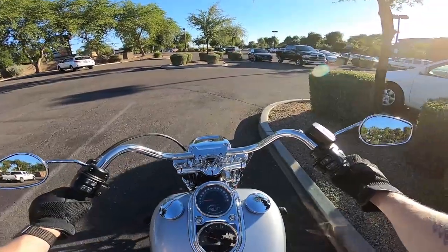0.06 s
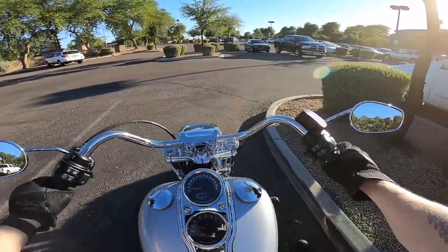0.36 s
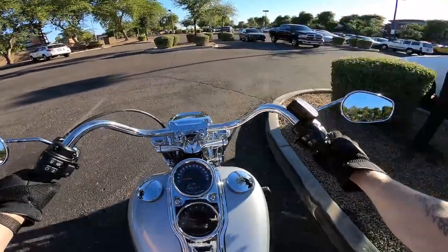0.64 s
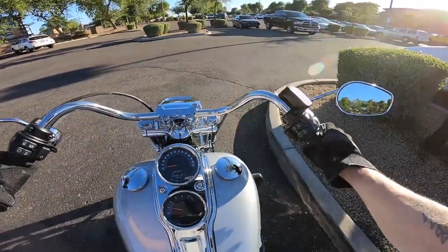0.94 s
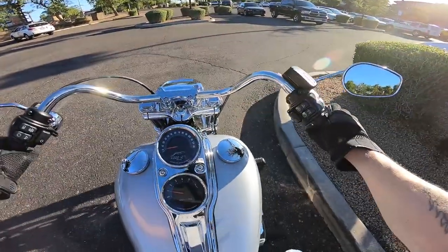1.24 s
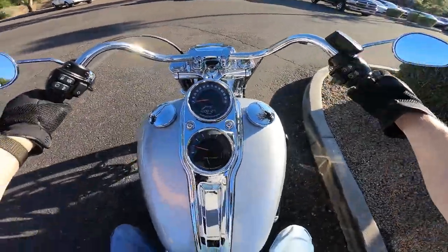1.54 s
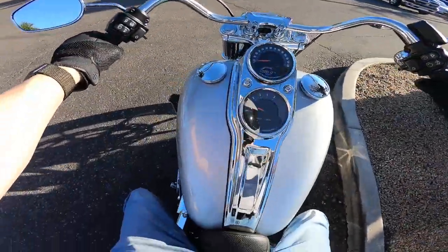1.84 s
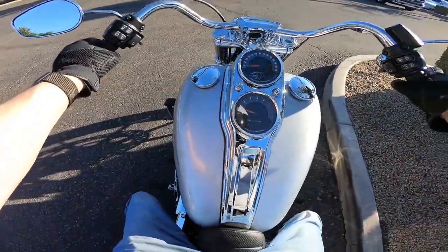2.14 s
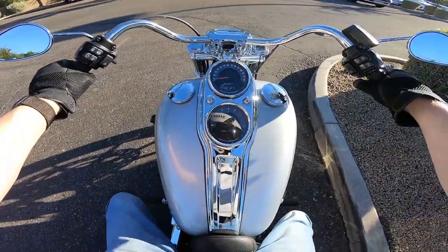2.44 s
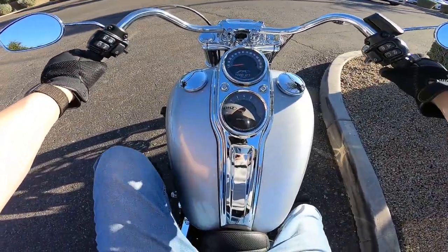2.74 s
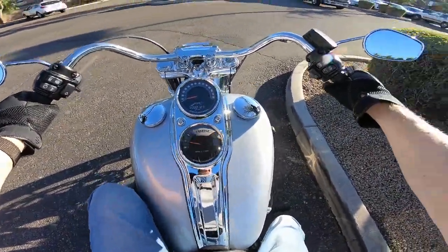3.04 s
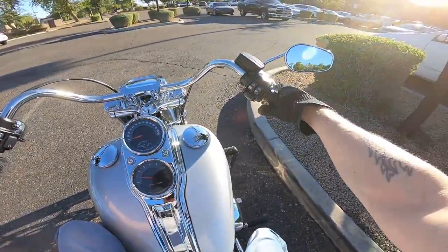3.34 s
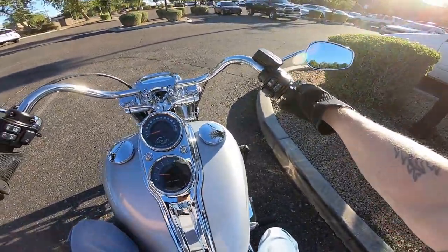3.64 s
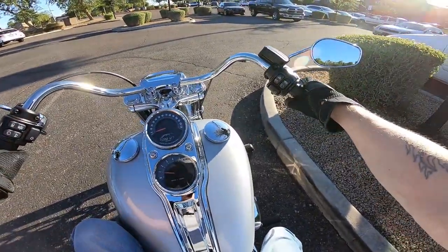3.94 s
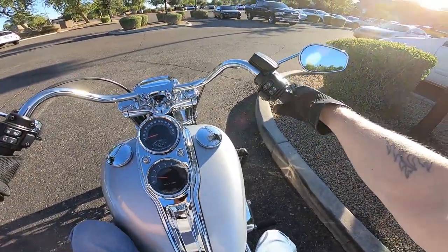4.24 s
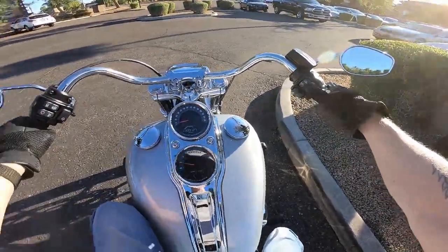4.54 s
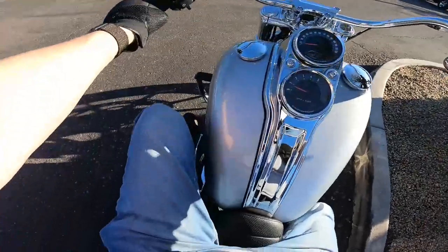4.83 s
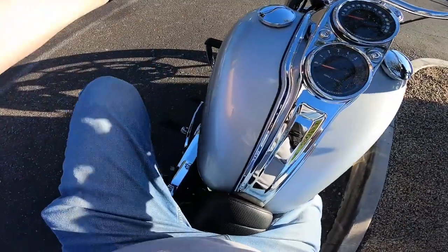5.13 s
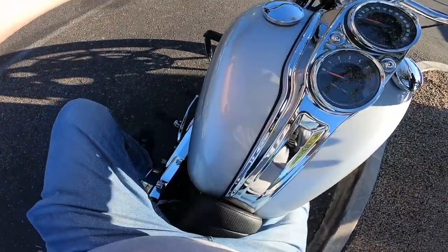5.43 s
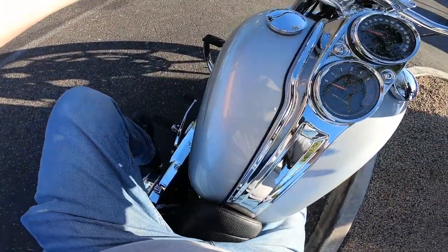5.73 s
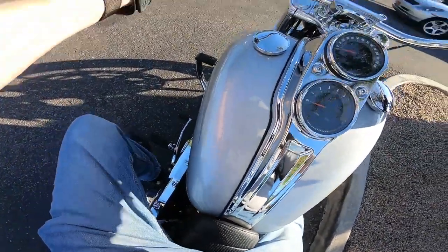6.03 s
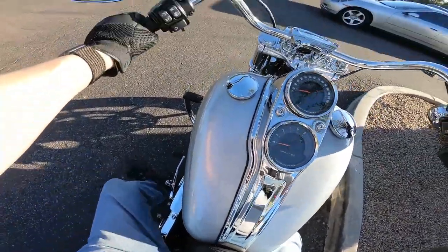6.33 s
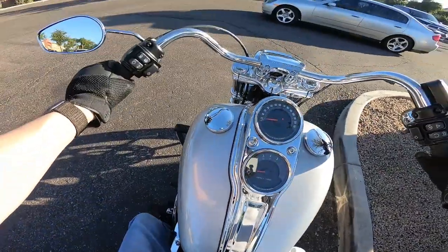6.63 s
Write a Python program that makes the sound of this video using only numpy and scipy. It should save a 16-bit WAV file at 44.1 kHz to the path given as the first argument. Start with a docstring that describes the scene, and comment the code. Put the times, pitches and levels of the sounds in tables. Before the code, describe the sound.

A big V-twin motorcycle is idling in a parking lot from the start, heard close and muffled from the rider's helmet. Its deep, loping throb begins slightly faster, settles within the first second, then keeps wavering a little in speed. Gear whine, light valve clatter and a very faint high fuel pump whine sit beneath it, with two dull knocks at around 0.3 seconds. A handlebar switch clicks at about 4.8 seconds and another at 5 seconds, and the firing ends right after. The engine coasts down and is still by about 5.8 seconds, shuddering with several dull jolts and small metal ticks. As the throb goes, a much quieter low rumble of distant traffic comes up, with a car humming softly past around 5.9 seconds. One last light tick comes at about 6.4 seconds.

```python
"""A car park, heard muffled from a rider's helmet: a big V-twin motorcycle idles unevenly.
Exhaust pulses and intake gulps excite the resonances of pipes and airbox, and throb over gear whine
and valve clatter. A switch clicks, the firing ends, and friction brings the crank to rest with a
shudder. A limiter, held down by the throb, then lets go, and distant traffic comes up."""
import sys
import numpy as np
from scipy import signal
from scipy.fft import rfft, irfft, next_fast_len
from scipy.io import wavfile
from scipy.ndimage import uniform_filter1d, minimum_filter1d

SR = 44100
rng = np.random.default_rng(int(sys.argv[2]) if len(sys.argv) > 2 else 0)


def to_wav(sig):
    """Store sig (one row per channel, or 1-D mono) as 16-bit WAV at the path in sys.argv[1].

    Samples outside -1..1 are clipped; the rate is SR.
    """
    pcm = np.clip(np.atleast_2d(sig), -1, 1) * 32767
    pcm = np.round(pcm).astype(np.int16)
    wavfile.write(sys.argv[1], SR, pcm.T)  # frames by channels


N = 294588
T = np.arange(N) / SR

CUT_S, COAST_S = 5.07, .7  # the ignition is cut; the crank then coasts to rest

# the idle, hunting as it settles: time_s, cycle_rate_hz (four-stroke cycles per second)
IDLE_SPEED = [(0.0, 8.497), (0.22, 8.411), (0.75, 7.153), (1.0, 7.937), (1.28, 8.119), (1.75, 7.47),
              (2.12, 7.832), (2.5, 7.419), (3.0, 7.782), (3.31, 6.971), (3.72, 7.417), (4.31, 7.214),
              (4.5, 6.723), (4.75, 7.527), (5.05, 6.983)]
# exhaust pulses of the two cylinders: phase_cycles, strength_db
EXHAUST_PULSES = [(.868, 6), (.285, -1)]
# intake gulps of the two cylinders: phase_cycles, strength_db
INTAKE_PULSES = [(.56, -1.9), (.131, 0.34)]
# valve openings: phase_cycles, strength_db
VALVE_OPENINGS = [(.83, -0.5), (.26, 2.1), (1, -3), (.56, -7.5)]
# exhaust pipe resonances: pitch_hz, bandwidth_hz, gain_db
PIPE_MODES = [(61.5, 26.4, -4), (103.3, 7.3, -13), (139, 12, -30.5)]
# spectrum of the outrushing gas: frequency_hz, gain_db
GAS_SPECTRUM = [(50, -28.5), (85, -9.5), (110, 0.5), (150, 7.5), (190, -14.5), (240, -33.5), (310, -23.5),
                (400, -25), (700, -57), (3000, -85.5)]
# response of the primary drive and gearbox housing: frequency_hz, gain_db
HOUSING_SPECTRUM = [(120, -8), (200, -7), (300, 2), (390, -8.5), (462, 5.5), (505, -6.5), (545, 0),
                    (630, -19), (900, -48), (3000, -82.5)]
# gear mesh tones: order_per_cycle, gain_db
GEAR_ORDERS = [(63.87, -11), (73.3, -15), (41.57, -14.5), (169.6, -21.5)]
# response of the crankcase and cylinder heads: frequency_hz, gain_db
CASE_SPECTRUM = [(380, -38.5), (650, -6.5), (800, -8.5), (980, -7), (1280, -2.5), (1550, -5), (2300, -6.5),
                 (2620, -18), (3400, -15), (4500, -18), (5200, -19), (6400, -19), (8600, -22),
                 (10400, -34.5), (13000, -55)]
# resonances of cooling fins and covers: pitch_hz, base_bandwidth_hz, gain_db
FIN_MODES = [(1288, 62, 4), (2210, 80, -11.5), (2954, 340, -6.5), (4420, 740, -14.5), (6170, 1500, -19)]
# fuel pump tones: pitch_hz, level_db
PUMP_TONES = [(2880, -68), (4320, -71)]
# envelope of the pump's thin top tone: time_s, level_db
PUMP_WHINE_ENVELOPE = [(0, -65), (.7, -65), (.9, -74), (1.3, -70), (2.1, -75), (3.2, -74), (3.45, -61),
                       (3.85, -74), (4.35, -66), (4.8, -66), (4.92, -80)]
# handlebar switches: start_s, t60_s, modes as (pitch_hz, peak_db, bandwidth_ratio)
SWITCH_SNAPS = [(4.776, .018, [(2010, -23.5, 0.27), (4330, -25, 0.28), (6760, -26, 0.32)]),
                (5.029, .011, [(790, -20.5, 0.45), (1250, -22, .5), (1750, -22, 0.4), (3000, -35, .5)])]
# small metal ticks and rattles: start_s, peak_db, pitch_hz, t60_s, bandwidth_ratio
METAL_TICKS = [(3.634, -36, 4630, 0.011, .7), (4.712, -41, 2330, 0.055, .1), (4.991, -33, 1200, .02, .7),
               (5.407, -39, 1100, 0.16, .9), (5.435, -38.5, 1180, .08, 0.69), (5.769, -36, 1700, 0.04, 1.0),
               (5.791, -37, 1300, 0.05, 0.83), (6.412, -40, 3500, 0.05, .8)]
# dull frame jolts, most as the engine rocks to rest: start_s, peak_db, pitch_hz, t60_s, bandwidth_ratio
FRAME_JOLTS = [(0.25, -17.5, 282, 0.74, 0.36), (0.365, -17.5, 280, 0.23, 0.24), (5.262, -24, 346, 0.2, 0.2),
               (5.31, -23.5, 298, 0.12, 0.14), (5.32, -13.5, 72, 0.27, 0.49),
               (5.408, -19.5, 276, 0.25, 0.63), (5.425, -18, 229, 0.2, 0.16), (5.52, -19, 78, 0.33, 0.31),
               (5.735, -21, 166, 0.23, 0.26), (5.774, -25.5, 384, 0.13, 0.46),
               (5.873, -24.5, 111, 0.037, 0.85)]
# spectrum of distant road rumble: frequency_hz, gain_db
ROAD_SPECTRUM = [(12, -30), (25, -4), (80, -3), (115, -10), (180, -6), (240, -9), (350, -12), (470, -25),
                 (750, -42), (1150, -38), (1900, -43), (2800, -52), (7300, -56), (10500, -68)]
# spectrum of a passing car's tyre hiss: frequency_hz, gain_db
TYRE_SPECTRUM = [(300, -20.5), (600, -2), (800, -6), (1150, -1), (1900, -9), (3000, -22), (9000, -33)]


def engine():
    """Rotating machinery: crank phase times every layer, and all fade as friction slows it evenly."""
    slowed = np.clip((T - CUT_S) / COAST_S, 0, 1)
    unfired = np.clip((T - CUT_S) / 0.011, 0, 1)
    idle_hz = np.interp(T, *np.transpose(IDLE_SPEED))
    speed_hz = idle_hz * (1 - slowed)
    cycles = np.cumsum(speed_hz) / SR
    unfired_db = -2.5 * unfired  # throb and gas drop at once when the firing ends
    throb_db = -10.5 + unfired_db - 15.5 * slowed
    gas_db = -31 + unfired_db - 18.5 * slowed
    # the clatter quietens as the idle settles, and swells whenever the crank speeds up
    clatter_db = -41 - 0.3953 * T + 3.0 * (idle_hz - idle_hz.mean()) - 27.5 * slowed
    layers = (undb(throb_db) * throb(cycles)
              + undb(gas_db) * (burble(cycles, unfired, slowed) + gears(cycles))
              + undb(clatter_db) * clatter(cycles)
              + undb(-56) * chain(cycles))
    return layers * np.clip(speed_hz / 2, 0, 1)


def throb(cycles):
    """Impulse-driven resonance: pulses ring the pipes and airbox; their uneven spacing gives the lope."""
    blows = lowpass(pulse_train(cycles, EXHAUST_PULSES, scatter_db=1.76, jitter_s=0.001), hz=246)
    pipe_modes = sum(undb(db) * ring(blows, hz, width) for hz, width, db in PIPE_MODES)
    pipe = ring(pipe_modes, hz=34.0, width_hz=42.3)
    gulps = pulse_train(cycles, INTAKE_PULSES, scatter_db=1.28, jitter_s=0.00097)
    airbox = ring(ring(gulps, hz=48.6, width_hz=22.1), hz=49.4, width_hz=25.2)
    # each firing also shakes the whole frame on its mounts
    shake = ring(ring(blows, hz=27.6, width_hz=20), hz=27.2, width_hz=23)
    return -unit(undb(-1.0) * unit(pipe) + unit(airbox) + undb(-14.5) * unit(shake))


def burble(cycles, unfired, slowed):
    """Pulsed turbulent flow: each valve opening thumps the muffler and vents gas; the housing drones."""
    openings = lowpass(pulse_train(cycles, VALVE_OPENINGS, scatter_db=1.0, jitter_s=0.00096), hz=168)
    thump = ring(ring(openings, hz=132.4, width_hz=33), hz=127.0, width_hz=62)
    thump_db = 5.5 - 5 * unfired - 14 * slowed
    flow = sum(undb(db) * puffs(cycles, [phase], decay_cycles=0.048) for phase, db in VALVE_OPENINGS)
    gas = colour(noise() * flow, GAS_SPECTRUM)
    drone = colour(noise() * (1 + .5 * flow) * undb(1.3 * wander(22)), HOUSING_SPECTRUM)
    return undb(thump_db) * unit(thump) + undb(4.0) * gas + undb(-3.5) * drone


def gears(cycles):
    """Phase modulation: the crank surges twice a cycle and smears the whine of the meshing teeth."""
    surge = 0.004 * np.sin(4 * np.pi * cycles) + 0.0032 * wander(45)
    return sum(undb(db + 3 * wander(40)) * np.sin(2 * np.pi * order * (cycles + surge))
               for order, db in GEAR_ORDERS)


def clatter(cycles, knocks_per_s=2600):
    """Random impact excitation: countless small knocks of chain and valve gear ring the case and fins."""
    size_db = 3.0 * np.minimum(rng.exponential(size=N), 2.5)
    knocks = unit(noise() * (rng.random(N) < knocks_per_s / SR) * undb(size_db))
    accents = 1 + 0.38 * puffs(cycles, [0.92, 0.23, .49, 0.81], decay_cycles=0.18)
    force = (knocks + 1.83 * noise()) * accents * undb(0.67 * wander(25))
    fins = sum(undb(db) * ring(ring(force, hz, 1.8 * width), hz, 1.8 * width)
               for hz, width, db in FIN_MODES)
    return undb(-1.5) * colour(force, CASE_SPECTRUM) + undb(-15.5) * unit(fins)


def chain(cycles, order=323):
    """An engine-order tone: the chain rings on its sprocket in short spells, pitched by crank speed."""
    surge = 0.0016 * np.sin(4 * np.pi * cycles) + 0.001 * wander(60)
    spells_db = 3.5 * np.tanh(wander(25))
    return undb(spells_db) * np.sin(2 * np.pi * order * (cycles + surge))


def impacts(contacts):
    """Damped vibration: each contact is a dying rattle in one resonance; bandwidth scales with pitch."""
    out = np.zeros(N)
    t = T[:SR // 3]
    for start_s, peak_db, hz, t60_s, bandwidth_ratio in contacts:
        burst = rng.standard_normal(len(t)) * undb(-60 * t / t60_s)
        body = ring(ring(burst, hz, bandwidth_ratio * hz), hz, bandwidth_ratio * hz)
        start = int(start_s * SR)
        out[start:start + len(t)] += (undb(peak_db) * body / np.abs(body).max())[:N - start]
    return out


def switches():
    """Modal response: each switch snaps once and rings all the resonances of its housing."""
    return impacts([(start_s, peak_db, hz, t60_s, bandwidth_ratio)
                    for start_s, t60_s, modes in SWITCH_SNAPS for hz, peak_db, bandwidth_ratio in modes])


def fuel_pump(whine_hz=8645, off_s=4.9):
    """Rotor tones: all waver together with the electric pump's speed; the highest comes and goes."""
    spin_s = np.cumsum(1 + 0.0019 * wander(90)) / SR
    whine_db = np.interp(T, *np.transpose(PUMP_WHINE_ENVELOPE))
    partials = PUMP_TONES + [(whine_hz, whine_db)]
    tones = sum(undb(db + 2 * wander(33)) * np.sin(2 * np.pi * hz * spin_s) for hz, db in partials)
    return tones * np.clip((off_s - T) / .05, 0, 1)


def traffic(pass_s=5.85, near_s=0.503, hum_hz=87.06, doppler_hz=7):
    """Doppler shift and spreading: over the road rumble a car swells and fades as its hum falls."""
    along = (T - pass_s) / near_s
    distance = np.hypot(1, along)  # 1 at the closest approach
    pitch_hz = hum_hz - doppler_hz * along / distance
    phase = 2 * np.pi * np.cumsum(pitch_hz * (1 + 0.01434 * wander(22))) / SR
    hum = undb(-35.5 + 3.1 * wander(5.0)) * np.sin(phase)
    hum += undb(-34 + 2 * wander(4.5)) * np.sin(2 * phase)
    rumble_gain = undb(-31) + undb(-39.5) / distance  # the steady road plus the passing car
    rumble = colour(noise(), ROAD_SPECTRUM) * rumble_gain * undb(0.53 * wander(7))
    tyres = colour(noise(), TYRE_SPECTRUM) * undb(-53 + 1.2 * wander(9)) / distance ** 2
    return hum / np.sqrt(distance) + rumble + tyres


def pulse_train(cycles, pulses, scatter_db, jitter_s):
    """Cycle-to-cycle variation: each pulse recurs a little early or late, weak or strong."""
    out = np.zeros(N)
    for phase, db in pulses:
        due = np.arange(phase, cycles[-1], 1)
        timing, strength = rng.standard_normal((64, 2))[:len(due)].T
        start_s = np.interp(due, cycles, T) + jitter_s * timing
        starts = np.clip(start_s * SR, 0, N - 1).astype(int)
        np.add.at(out, starts, undb(db + scatter_db * strength))
    return out


def puffs(cycles, phases, decay_cycles):
    """Exponential decay: an envelope that reopens at the given phases of every cycle."""
    return sum(np.exp(-((cycles - phase) % 1) / decay_cycles) for phase in phases)


def ring(x, hz, width_hz):
    """Second-order resonance, with gain 1 at its centre."""
    quality = hz / min(width_hz, .3 * SR)
    return signal.lfilter(*signal.iirpeak(min(hz, .45 * SR), quality, SR), x)


def lowpass(x, hz, order=2):
    """Low-pass filtering: removing treble rounds the edges of a wave."""
    return signal.sosfilt(signal.butter(order, hz, fs=SR, output="sos"), x)


def colour(x, spectrum):
    """Spectral shaping by a curve through (frequency_hz, gain_db) points; rms 1."""
    hz, db = np.transpose(spectrum)
    size = next_fast_len(N)
    bins_hz = np.maximum(np.fft.rfftfreq(size, 1 / SR), 1)
    gain = undb(np.interp(np.log(bins_hz), np.log(hz), db))
    return unit(irfft(rfft(x, size) * gain, size)[:N])


def wander(rate_hz):
    """Random modulation: a glide to a new value about rate_hz times a second; rms 1."""
    hold = int(SR / rate_hz)
    steps = np.repeat(rng.standard_normal(N // hold + 1), hold)
    return unit(uniform_filter1d(steps, hold)[:N])


def noise():
    """White noise: equal mean power at all frequencies."""
    return rng.standard_normal(N)


def undb(db):
    """Decibels to amplitude ratio."""
    return 10 ** (np.asarray(db) / 20)


def unit(x):
    """Normalisation to rms 1."""
    return x / np.sqrt(np.mean(x ** 2) + 1e-18)


def scene():
    """Superposition: the motorcycle's sounds and the traffic add in one channel."""
    motorcycle = engine() + fuel_pump() + switches() + impacts(METAL_TICKS) + impacts(FRAME_JOLTS)
    return (motorcycle + traffic())[None]


def limiter(x, limit_db=-5.5, release_db_per_s=26, lookahead_s=0.029):
    """Peak limiting: the gain falls just ahead of each peak over the limit and climbs back slowly."""
    allowed_db = np.minimum(limit_db - 20 * np.log10(np.abs(x) + 1e-9), 0)
    climb_db = release_db_per_s * T
    gain_db = np.minimum.accumulate(allowed_db - climb_db, axis=-1) + climb_db
    window = int(2 * lookahead_s * SR)
    return x * undb(uniform_filter1d(minimum_filter1d(gain_db, window), window))


def record(dry, top_hz=15700):
    """Peak and band limiting: the throb is held down, the treble is lost and a trace of hiss is added."""
    muffled = lowpass(limiter(dry), hz=9800, order=8)
    hiss = undb(-74) * noise()
    return signal.sosfilt(signal.ellip(8, .2, 70, top_hz, fs=SR, output="sos"), muffled + hiss)


dry = scene()
out = record(dry)
to_wav(out)
```